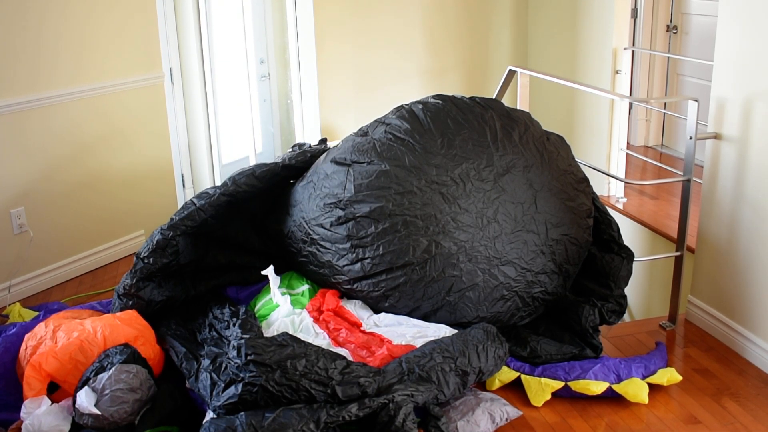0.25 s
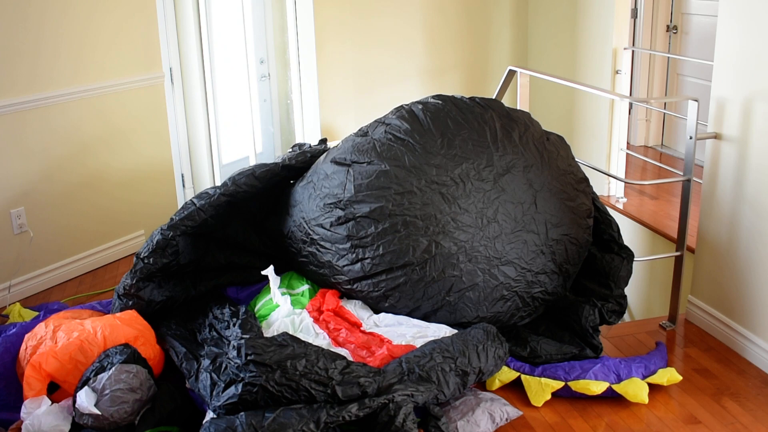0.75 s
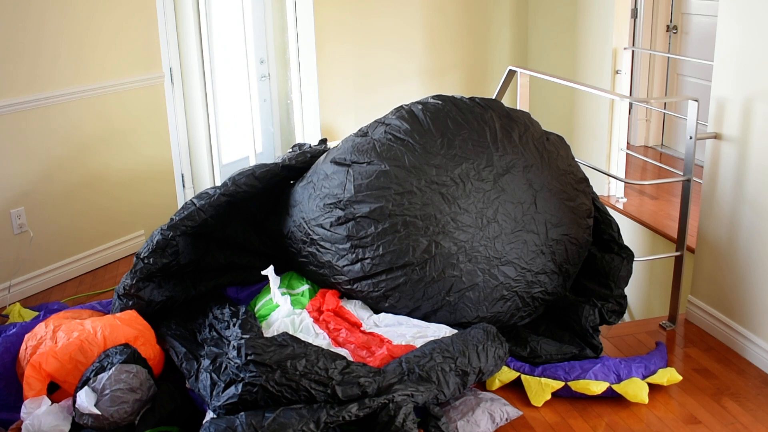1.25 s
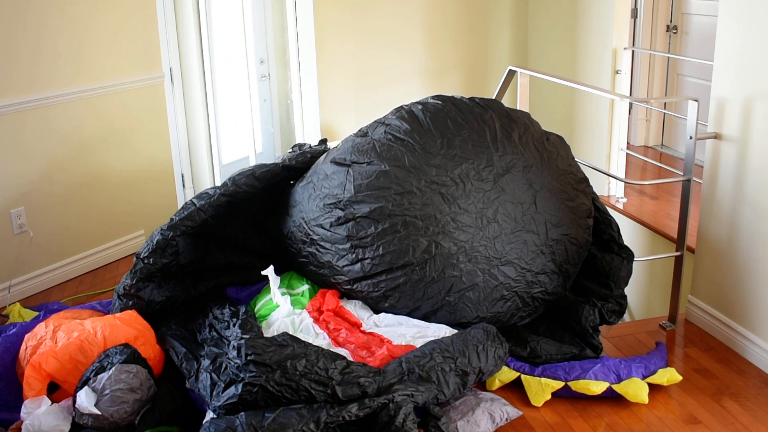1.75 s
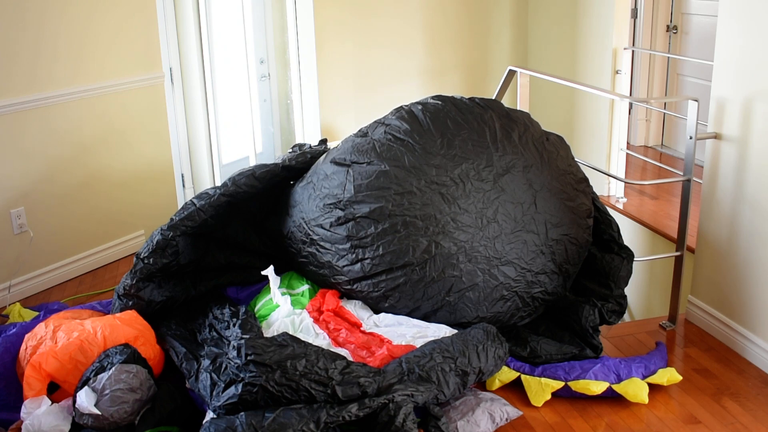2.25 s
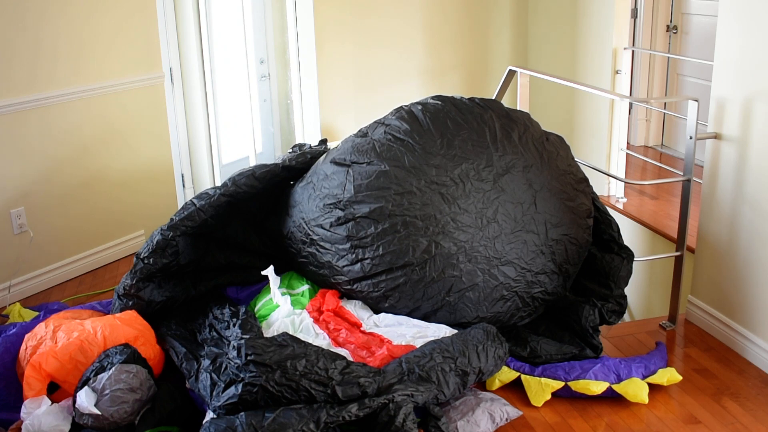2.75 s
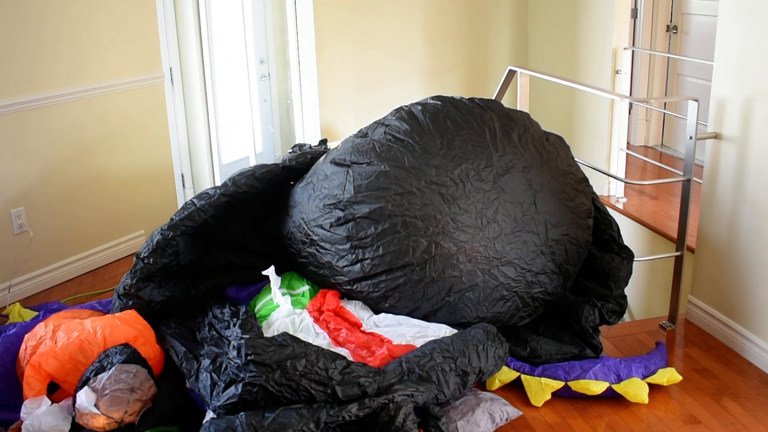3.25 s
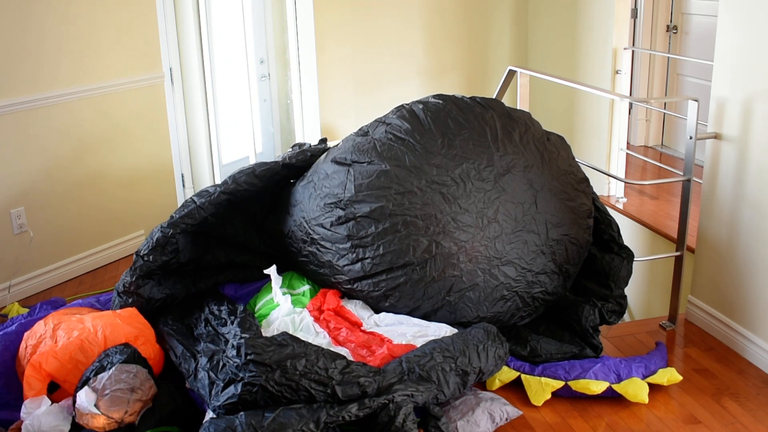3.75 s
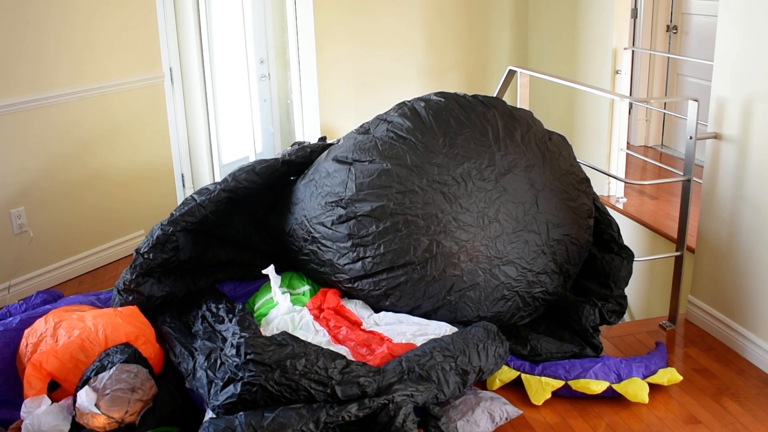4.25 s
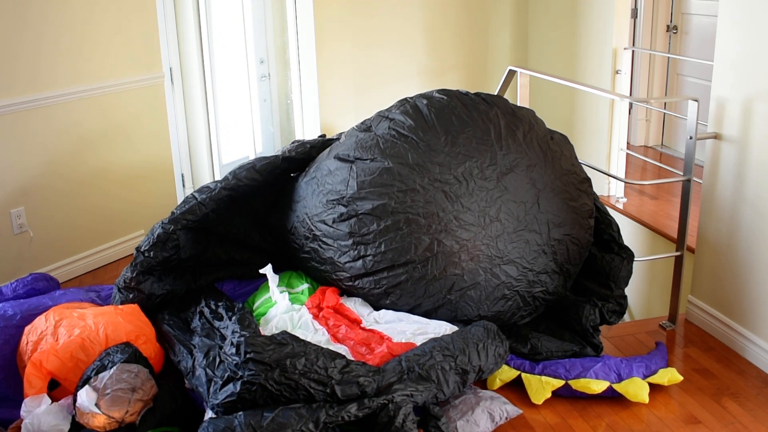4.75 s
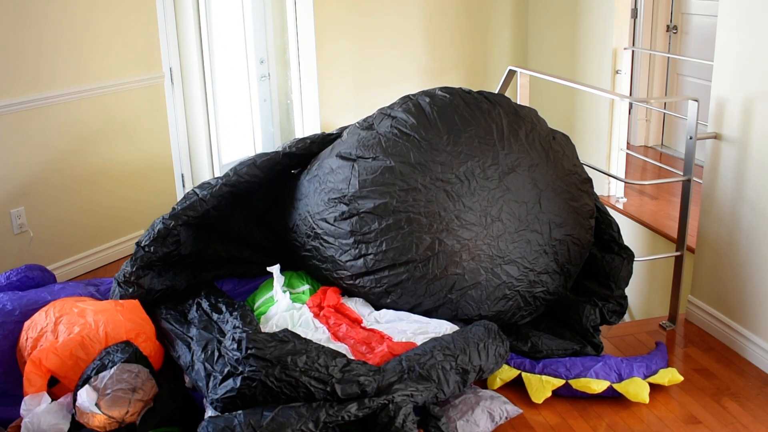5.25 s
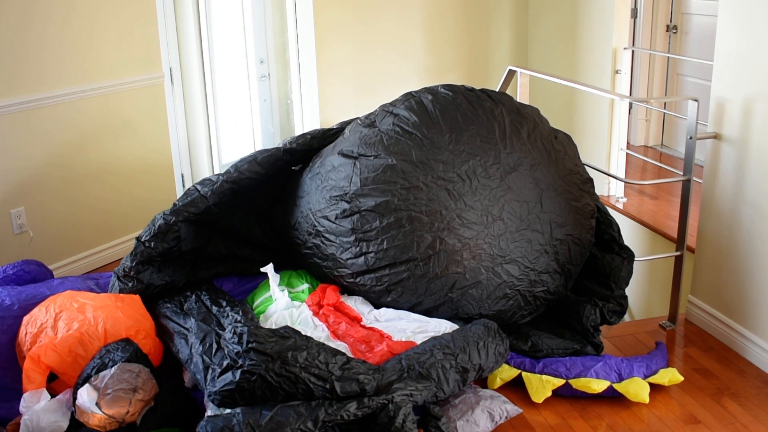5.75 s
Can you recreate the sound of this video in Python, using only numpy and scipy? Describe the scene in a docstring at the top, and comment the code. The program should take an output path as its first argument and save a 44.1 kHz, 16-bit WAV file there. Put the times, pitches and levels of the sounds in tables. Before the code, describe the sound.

In a bare, moderately echoing room, soft knocks, ticks and faint rustles of handling come first. A sharp plastic switch click starts a small electric blower; a second click soon starts another. Both run up in about a second and settle into a steady hollow rush of air with two thin, slightly differing whines that waver. The microphone stays fixed in the room.

```python
"""In a bare room with a wooden floor, knocks, ticks and faint rustles of handling surround two sharp clicks.
Each click starts a small electric blower: both spin up, rush and whine at slightly different pitches
as they fill a large fabric decoration. Contacts are noise bursts through body resonances, with walls and tail;
airflow is shaped noise and each whine a blade tone, both driven by rotor speed; soft noise is the room tone."""
import sys
import numpy as np
from scipy import signal
from scipy.fft import rfft, irfft, next_fast_len
from scipy.io import wavfile
from scipy.ndimage import map_coordinates

SR = 44100
rng = np.random.default_rng(int(sys.argv[2]) if len(sys.argv) > 2 else 0)


def store_pcm(level_fs):
    """Save levels as 16-bit WAV."""
    pcm = np.round(np.clip(level_fs, -1, 1) * 32767).astype(np.int16)
    wavfile.write(sys.argv[1], SR, np.atleast_2d(pcm).T)


N = 264600


def amp(db):
    """Decibels to gain."""
    return 10 ** (np.asarray(db) / 20)


def unit(x):
    """x at rms 1."""
    return x / np.sqrt(np.mean(x ** 2) + 1e-20)


def unit_energy(x):
    """x at total energy 1."""
    return x / np.linalg.norm(x)


def along(points, hz):
    """(frequency [Hz], value) points read on a log frequency axis."""
    f, v = np.transpose(points)
    return np.interp(np.log(hz + 1), np.log(f + 1), v)


def curve(rows):
    """(time [s], value) rows read at every sample."""
    s, values = np.transpose(rows)
    return np.interp(np.arange(N) / SR, s, values)


def wobble(knots_per_s):
    """A smooth random curve through normally distributed knots."""
    return map_coordinates(rng.standard_normal(2048), [np.arange(N) * knots_per_s / SR], mode="wrap")


def bell(s, sigma_s):
    """A Gaussian swell that peaks at 1 at time s."""
    return np.exp(-((np.arange(N) / SR - s) / sigma_s) ** 2 / 2)


def filtered(x, response):
    """x times a complex response of frequency, zero-padded."""
    m = 2 * next_fast_len(len(x) // 2 + SR // 4)
    spectrum = rfft(x, m) * response(np.fft.rfftfreq(m, 1 / SR))
    return irfft(spectrum, m)[:len(x)]


def resonance(f, hz, width_hz):
    """Causal second-order resonance with gain 1 at its centre."""
    return 1j * f * width_hz / (hz * hz - f * f + 1j * f * width_hz)


def hump(f, hz, width_hz):
    """Gain of a damped body resonance with steep skirts."""
    return np.abs(resonance(f, hz, width_hz)) ** 2


def causal(gain):
    """Minimum-phase response with this gain, by folding the cepstrum."""
    cepstrum = irfft(np.log(gain))
    half = len(cepstrum) // 2
    fold = np.r_[1, np.full(half - 1, 2), 1, np.zeros(half - 1)]
    return np.exp(rfft(cepstrum * fold))


def noise(spectrum):
    """Noise of rms 1 with a (frequency [Hz], relative level [dB]) spectrum."""
    return unit(filtered(rng.standard_normal(N), lambda f: amp(along(spectrum, f))))


def add(track, s, sound):
    """Mix a sound into the track at time s."""
    part = track[round(s * SR):][:len(sound)]
    part += sound[:len(part)]


def roomy(x, ripple_db, spacing_hz):
    """Standing waves lay a fixed, fine ripple on the spectrum of a steady source; rms 1."""
    knots = rng.standard_normal(6000)

    def ripple(f):
        return amp(ripple_db * np.tanh(map_coordinates(knots, [f / spacing_hz], mode="wrap")))

    return unit(filtered(x, ripple))


def background():
    """Steady room tone, and faint handling rustles that swell and settle before the blowers start."""
    # room tone: (frequency [Hz], relative density [dB per Hz])
    tone_spectrum = [(15, -20), (25, 3.5), (40, 0.5), (90, -14), (150, -9), (300, -7), (550, -15.5),
                     (1200, -19), (2300, -22), (7000, -28), (11000, -32), (15800, -39)]
    # rustles: (peak time [s], level [dB], Gaussian sigma [s])
    rustle_rows = [(.56, -56.5, 0.093), (0.944, -52.5, .08), (1.403, -52.5, 0.13)]
    swells = sum(amp(db) * bell(s, sigma_s) for s, db, sigma_s in rustle_rows)
    friction = noise([(300, -1), (900, 0.0), (2200, -1), (5000, -11.5), (14000, -23)])
    rustle = swells * amp(0.5 * wobble(9.3)) * friction
    return amp(-52.5) * noise(tone_spectrum) + rustle


def blow(chatter_t60_s, early_db, early_t60_s, tail_db):
    """A brief chattering contact, the near walls' answer and the room's tail."""
    # reverberation: (frequency [Hz], t60 [s])
    room_t60 = [(100, 0.41), (300, 0.75), (800, 0.66), (2000, 0.5), (5000, 0.5), (13000, 0.34)]
    t = np.arange(SR * 3 // 4) / SR
    contact, early, late = rng.standard_normal((3, len(t)))
    contact = unit_energy(contact * amp(-60 * t / chatter_t60_s))
    arrive = 1 - np.exp(-t / 0.0051)  # reflections build up over about 5 ms
    walls = unit_energy(early * arrive * amp(-60 * t / early_t60_s))
    hz, age, z = signal.stft(late, SR, nperseg=256)
    decay = amp(-60 * age / along(room_t60, hz)[:, None])
    tail = signal.istft(z * decay, SR, nperseg=256)[1][:len(t)]
    return contact + amp(early_db) * walls + amp(tail_db) * unit_energy(tail * arrive)


def handling():
    """Each knock has a dull thud, a bright ring and a little crack; one sets metal ringing."""
    # parts of knocks: (time [s], gain [dB], chatter t60 [s], thud [Hz], thud width [Hz],
    # ring [Hz], ring width [Hz], ring gain [dB], crack gain [dB])
    knock_rows = [(.019, 0.5, 0.13, 325, 487, 1900, 1500, -33, -50),
                  (0.118, 9, 0.04, 423, 406, 4700, 1100, -5.5, -30),
                  (0.122, 13, 0.05, 195, 124, 3200, 1300, -17, -38),
                  (0.661, 6, 0.025, 155, 150, 2000, 1450, -8, -28),
                  (1.038, -6.5, 0.2, 350, 650, 10300, 790, -12, -11),
                  (1.478, -14.5, 0.043, 400, 400, 2530, 1300, 2.5, -26),
                  (1.598, -6, 0.11, 170, 260, 890, 500, -20, -17),
                  (2.866, 10, 0.19, 46, 60, 2770, 1195, -30, -21),
                  (2.882, 13, 0.077, 235, 77.4, 2720, 600, -15.5, -24),
                  (3.840, -3, 0.045, 100, 100, 13000, 6000, -30, -1)]
    # ringing modes of a small metal part: (time [s], frequency [Hz], start level [dB] before echoes, t60 [s])
    ping_rows = [(1.036, 3575, -49, .36), (1.036, 4700, -57, .2), (1.036, 10120, -58, .2)]
    out = np.zeros(N)
    for s, db, t60_s, thud_hz, thud_width_hz, ring_hz, ring_width_hz, ring_db, crack_db in knock_rows:
        def body(f):
            narrow = resonance(f, thud_hz, thud_width_hz)
            wide = resonance(f, thud_hz, 3 * thud_width_hz)
            thud = np.abs(narrow * wide)
            ring = amp(ring_db) * hump(f, ring_hz, ring_width_hz)
            crack = amp(crack_db) / (1 + (f / 4500) ** 2)  # soft contacts lack the highest treble
            return causal(thud + ring + crack)

        hit = blow(t60_s, early_db=-4.0, early_t60_s=0.058, tail_db=0)
        add(out, s, amp(db) * filtered(hit, body))
    t = np.arange(SR // 2) / SR
    for s, hz, db, t60_s in ping_rows:
        echoes_db = 4 * wobble(110)[:len(t)]  # reflections beat against the ring
        level = amp(db + echoes_db - 60 * t / t60_s)
        add(out, s, level * np.sin(2 * np.pi * hz * t))
    return out


def switches():
    """Contacts scrape and snap in a plastic housing, shaking the wall and ringing the switch body."""
    # contacts that power the blowers: (time [s], level [dB] relative to the -7 dB trim, chatter t60 [s],
    # wall thump gain [dB], snap gain [dB], switch body ring [Hz])
    contact_rows = [(2.5452, 5, 0.061, -1, -5, 3000), (2.554, 16, 0.017, -2.5, -43, 3050),
                    (2.5597, 7.5, 0.14, 9, -35, 3000), (3.25, 14.5, 0.017, -15, -9.5, 2740),
                    (3.253, 13.5, 0.012, -15, -0.5, 2820)]
    # plastic housing of the contacts: (frequency [Hz], gain [dB])
    housing_gain = [(100, -17.5), (450, -15), (800, -15), (1050, -5), (1350, -26), (1700, -5), (2200, -6),
                    (2850, -2), (3200, -11.5), (4500, -16), (5400, -10.5), (6800, -16), (8500, -14.5),
                    (13000, -23), (16000, -24)]
    # modes of the wall behind them: (frequency [Hz], width [Hz], gain [dB] relative to the thump)
    wall_modes = [(45, 16, 4), (147, 36, 6.5), (373, 520, -7), (650, 98, -4), (1364, 130, 0)]
    trim_db, ring_db, ring_width_hz = -7, -2.5, 580
    out = np.zeros(N)
    for s, db, t60_s, thump_db, snap_db, ring_hz in contact_rows:
        def body(f):
            housing = amp(along(housing_gain, f))
            ring = amp(ring_db) * hump(f, ring_hz, ring_width_hz)
            thump = sum(amp(mode_db) * hump(f, hz, width_hz) for hz, width_hz, mode_db in wall_modes)
            snap = amp(3.5) * hump(f, hz=3780, width_hz=480) + amp(-8.5) * hump(f, hz=9800, width_hz=3300)
            return causal(housing + ring + amp(thump_db) * thump + amp(snap_db) * snap)

        hit = blow(t60_s, early_db=-5.0, early_t60_s=0.044, tail_db=-4.0)
        add(out, s, amp(db + trim_db) * filtered(hit, body))
    return out


def rotor(on_s, run_up_s, knee, full_hz, hunt_hz):
    """Share of full speed: an even acceleration that levels off, with a slow hunting under the load."""
    hunt_period_s = 1.8
    since_s = np.maximum(np.arange(N) / SR - on_s, 1 / SR)
    pull = since_s / run_up_s
    hunting = 1 + hunt_hz / full_hz * np.cos(2 * np.pi * since_s / hunt_period_s)
    return hunting * pull / (1 + pull ** knee) ** (1 / knee)


def spinning(x, pace):
    """Frequencies of flow noise rise with the rotor: x is read at pace times its full-speed rate."""
    return map_coordinates(x, [np.cumsum(pace)], mode="wrap")


def airflow(speed, full_roar_db, full_hiss_db):
    """Turbulence grows with fan speed: a hollow roar, narrow resonances and a smooth hiss."""
    # turbulence in the fan housings at full speed: (frequency [Hz], relative density [dB per Hz])
    roar_spectrum = [(20, -18), (45, -47), (68, -22), (120, -24), (190, -10.5), (280, -3), (400, 2),
                     (530, -2), (640, -12), (1000, -40), (3000, -70)]
    # turbulence at the intakes at full speed: (frequency [Hz], relative density [dB per Hz])
    hiss_spectrum = [(60, -45), (200, -49), (600, -3), (800, 1), (1100, 1.5), (1500, 0), (1900, -3),
                     (3000, -9), (4000, -13.5), (5800, -16.5), (7300, -17), (8500, -21.5), (10200, -23),
                     (13000, -29.5), (15800, -40)]
    # narrow resonances that the flow excites: (frequency [Hz], relative gain [dB])
    hollow_modes = [(29, -13.5), (48, -12.5), (155, -3.5), (286, 0.5), (372, 3.5), (418, 2), (469, 0.5),
                    (930, -2), (995, -8), (1033, -6), (1146, -21), (1330, -18)]
    roar_growth_db, hiss_growth_db = 72.5, 79  # per tenfold speed
    roar_brightens, hiss_brightens = .55, .24  # frequencies rise as this power of speed
    roar_db = full_roar_db + roar_growth_db * np.log10(speed)
    hiss_db = full_hiss_db + hiss_growth_db * np.log10(speed)
    surge = wobble(11)

    roar_flow = spinning(noise(roar_spectrum), speed ** roar_brightens)
    roar = amp(roar_db - 3.5 + 0.55 * surge) * roomy(roar_flow, ripple_db=3.0, spacing_hz=10)
    hiss_flow = spinning(noise(hiss_spectrum), speed ** hiss_brightens)
    hiss = amp(hiss_db + 0.3 * surge) * roomy(hiss_flow, ripple_db=3.5, spacing_hz=14)

    def peaks(f):
        return sum(amp(db) / (1 + ((f - hz) / 7) ** 2) for hz, db in hollow_modes)

    hollows = amp(roar_db - 4.5) * unit(filtered(rng.standard_normal(N), peaks))
    return roar + hiss + hollows


def whine(speed, full_hz, level_db, flutter_db, waver_hz, halo_db):
    """Blade tone of one blower: it emerges near full speed; eddies flutter it and spread a narrow halo."""
    gain_db, growth_db = 2.5, 160  # growth per tenfold speed
    db = gain_db + level_db + growth_db * np.log10(speed) + flutter_db * wobble(25)
    phase = 2 * np.pi * np.cumsum(full_hz * speed + waver_hz * wobble(40)) / SR
    halo = wobble(120) * np.sin(phase) + wobble(120) * np.cos(phase)
    tone = np.sin(phase) + amp(-22) * np.sin(2 * phase)
    return amp(db) * (tone + amp(halo_db) * halo)


def blowers():
    """Each motor's speed drives its own rush of air and its blade tone."""
    # the two motors: (switched on [s], run-up [s], sharpness of levelling off [1],
    # blade tone at full speed [Hz], hunting depth [Hz])
    motor_rows = [(2.554, 1.12, 10, 1391.5, 8.5), (3.25, 1.04, 6, 1477, 1)]
    # full-speed airflow per blower, before the trims in airflow: (roar [dB], hiss [dB])
    flow_levels = [(-30, -33), (-33.5, -35.6)]
    # blade tone per blower, swelling and fading in the room: (time [s], level [dB] before the whine's gain)
    whine_levels = [
        [(3.75, -42), (3.94, -34.5), (4.24, -35), (4.33, -28.5), (4.44, -41), (4.46, -31.5), (4.81, -38),
         (5.06, -29.5), (5.32, -38), (5.47, -27.5), (5.59, -41), (5.71, -27), (5.79, -39), (6.0, -37.5)],
        [(4.5, -43), (4.758, -37), (4.812, -45), (5.138, -34), (5.606, -43), (6.0, -33.5)],
    ]
    # slow swell of the roar: (time [s], gain [dB])
    roar_swell = [(3.6, 1), (3.82, 3.5), (4.3, 0.9), (4.58, 3), (4.8, 1), (5.38, 2.5), (5.65, 1.7)]
    out = np.zeros(N)
    swell_db = curve(roar_swell)
    for motor, (roar_db, hiss_db), levels in zip(motor_rows, flow_levels, whine_levels):
        on_s, run_up_s, knee, full_hz, hunt_hz = motor
        speed = rotor(on_s, run_up_s, knee, full_hz, hunt_hz)
        out += airflow(speed, roar_db + swell_db, hiss_db)
        out += whine(speed, full_hz, curve(levels), flutter_db=2.5, waver_hz=2.5, halo_db=-15.5)
    return out


def scene():
    """Room tone and rustles, handling, two clicks and two blowers in one room."""
    return (background() + handling() + switches() + blowers())[None]


def record(dry):
    """Brick-wall low-pass: nothing is kept from the band limit up."""
    top_hz = 15850
    return np.array([filtered(x, lambda f: f < top_hz) for x in dry])


dry = scene()
out = record(dry)
store_pcm(out)
```